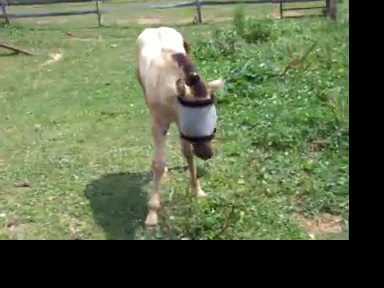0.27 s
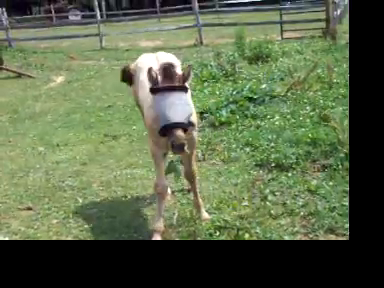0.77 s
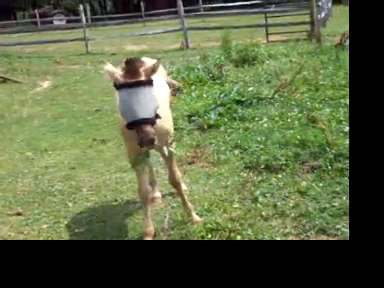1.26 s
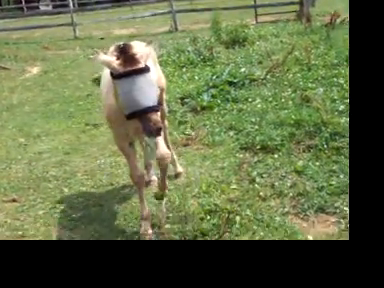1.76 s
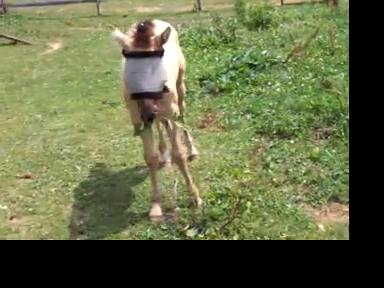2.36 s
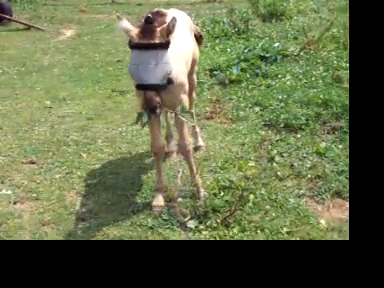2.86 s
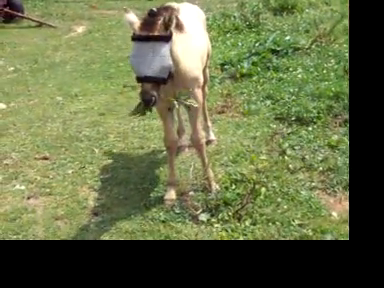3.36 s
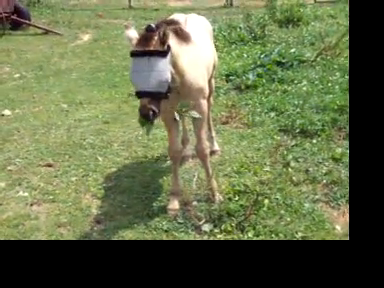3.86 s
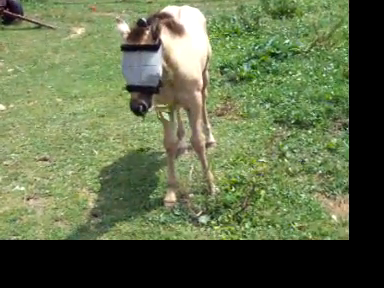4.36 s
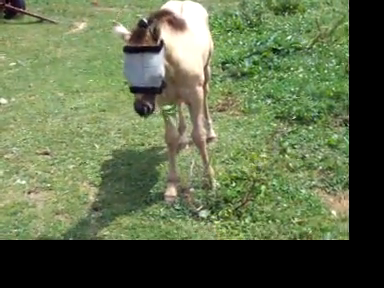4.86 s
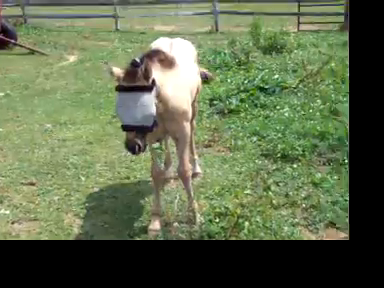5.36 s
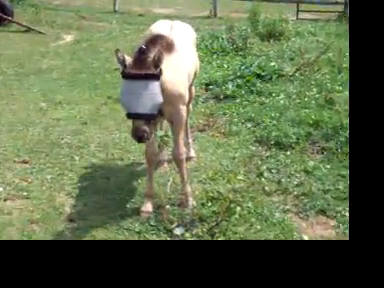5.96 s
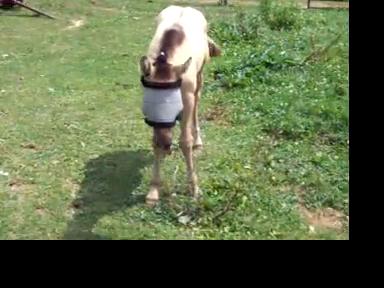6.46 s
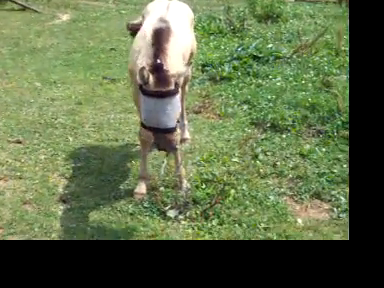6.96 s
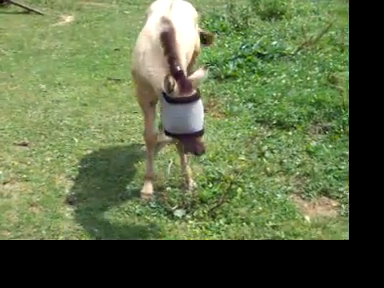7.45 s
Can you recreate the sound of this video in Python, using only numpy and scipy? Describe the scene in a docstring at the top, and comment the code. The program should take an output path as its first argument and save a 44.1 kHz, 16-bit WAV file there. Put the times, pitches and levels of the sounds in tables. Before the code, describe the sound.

A small camera's zoom motor buzzes in quick stuttering bursts, then case clicks and a scrape, over birdsong, grass swishes and light breeze in a pasture.

```python
"""Zoom camera in a summer pasture

A small hand-held camera buzzes as its zoom motor runs in short bursts of steps, each kicking the lens barrel.
Fingers click and scrape on the nearby case, which rings at its own pitches.
Grass swishes as clouds of tiny snaps, birds chirp in gliding tones, and insects shrill as a narrow hiss.
Behind them a distant engine drones and fades, a rush of air passes, and noise makes the wind and leaves."""
import sys
import numpy as np
from scipy import signal
from scipy.fft import rfft, irfft, next_fast_len
from scipy.io import wavfile
from scipy.ndimage import map_coordinates

SR = 44100
rng = np.random.default_rng(int(sys.argv[2]) if len(sys.argv) > 2 else 0)


def log_audio(samples):
    """Write samples as a 16-bit WAV file to the path given in sys.argv[1]."""
    # one column per channel
    frames = np.atleast_2d(samples).T
    # limit to full scale, then quantise
    limited = np.clip(frames, -1, 1)
    pcm = np.round(limited * 32767).astype(np.int16)
    wavfile.write(sys.argv[1], SR, pcm)


N = 340893
TIME = np.arange(N) / SR   # seconds


def from_db(db):
    """Turn decibels into a gain."""
    return 10 ** (np.asarray(db) / 20)


def rms_one(x):
    """Scale a sound to unit power."""
    return x / np.sqrt(np.mean(x ** 2) + 1e-20)


def in_time(rows):
    """Join the points of each column by straight lines, sample by sample."""
    s, *columns = np.transpose(rows)
    return [np.interp(TIME, s, column) for column in columns]


def drift(rate):
    """Wander smoothly at random, with so many new values per second and a spread of 1."""
    knots = rng.standard_normal(int(N / SR * rate) + 4)
    return rms_one(map_coordinates(knots, [TIME * rate], order=2, mode="nearest"))


def band(x, low_hz, high_hz):
    """Keep only the pitches between two limits."""
    sos = signal.butter(2, [low_hz, min(high_hz, .45 * SR)], "band", fs=SR, output="sos")
    return signal.sosfilt(sos, x)


def coloured(x, spectrum):
    """Shape a noise with a smooth spectrum, then scale it to unit power."""
    hz, db = np.transpose(spectrum)
    size = next_fast_len(N)
    bin_hz = np.maximum(np.arange(size // 2 + 1) * SR / size, 1)
    gain = from_db(np.interp(np.log(bin_hz), np.log(hz), db))
    return rms_one(irfft(rfft(x, size) * gain, size)[:N])


def ring(clicks, hz, t60):
    """Let each click set off a sine that dies by 60 dB in t60 seconds; a unit click starts it at height 1."""
    decay = from_db(-60 / (t60 * SR))
    turn = 2 * np.pi * hz / SR
    return signal.lfilter([0, np.sin(turn)], [1, -2 * decay * np.cos(turn), decay * decay], clicks + 1e-18)


def grains(per_s, spread_db):
    """Scatter tiny contacts of uneven size and random sign."""
    hits = rng.random(N) < per_s / SR
    signs = rng.choice([-1, 1], N)
    return hits * signs * from_db(spread_db * np.clip(rng.standard_normal(N), -2, 2))


def add(track, s, sound):
    """Mix a short sound into a track at a time in seconds."""
    at = max(round(s * SR), 0)
    track[at:at + len(sound)] += sound[:max(N - at, 0)]


def swell(s, half_s):
    """Rise and fall like a bell curve, 1 at its peak."""
    return np.exp(-((TIME - s) / half_s) ** 2 / 2)


def stroke(s, length_s, attack_s, sag_db_per_s, release_s):
    """Rise quickly, sag while held, then let go."""
    age = TIME - s
    attack = np.clip(age / attack_s, 0, 1)
    hold = from_db(-sag_db_per_s * np.clip(age - attack_s, 0, length_s))
    return attack * hold * np.exp(-np.maximum(age - length_s, 0) / release_s)


# Runs of the zoom motor. Each row: start in seconds, length in seconds.
ZOOM_RUNS = [(0.048, 0.011), (0.1108, 0.0051), (0.162, 0.0043), (.2106, 0.0064), (0.2937, 0.011),
             (0.36, 0.005), (0.4108, 0.0069), (0.461, .0062), (0.541, 0.015), (.609, 0.0068), (.661, 0.005),
             (0.71, 0.008), (.7923, 0.01), (1.2368, 0.005), (1.3085, 0.0067), (1.3602, 0.007), (1.41, .006),
             (1.491, 0.012), (1.608, .006), (1.6606, 0.0047), (1.709, .006), (1.7907, 0.015),
             (1.858, 0.0065), (1.909, 0.0064), (1.9572, 0.0075), (2.038, 0.01), (3.386, 0.0045),
             (3.4562, 0.008), (3.507, 0.0049), (3.555, 0.0077), (3.637, 0.01)]
# Ringing pitches of the lens barrel. Each row: pitch in Hz, strength in dB, time to die by 60 dB in seconds.
BARREL_MODES = [(248, -11.5, 0.043), (386, -11, 0.087), (558.6, -6, 0.053), (820, -0.5, 0.013),
                (981, -2, 0.027), (1320, -5.5, 0.018), (1990, -21, 0.016), (2430, -17, 0.031),
                (2944, -19.5, 0.007), (3960, -7.5, 0.0068), (4900, -24, 0.0042)]
STEP_HZ, NUDGE_HZ, DRIVER_HZ = 495.5, 538, 5857   # step rate of long runs and of short nudges; coil whistle
RUN_DB, NUDGE_DB, KNOCK_DB = -31.5, -33.5, -30   # typical step of a run and of a nudge; the knock ending a nudge


def zoom_motor(lead_s=0.0059, driver_db=-16, grit_db=-7.5, rattle_db=-9, first_step_db=-5, tail_s=0.0082,
               colour_db=1.5):
    """The coils whistle, then each step kicks the lens barrel; gears grind, and knock when a short nudge stops."""
    kicks, powered, turning = np.zeros((3, N))
    for s, length in ZOOM_RUNS:
        nudge = length < .008
        step_s, db = (1 / NUDGE_HZ, NUDGE_DB) if nudge else (1 / STEP_HZ, RUN_DB)
        count = max(round(length / step_s), 1)
        sizes = from_db(db + 2 * rng.standard_normal(16))   # steps kick unevenly
        add(kicks, s - step_s, sizes[-1:] * from_db(first_step_db))
        for k in range(count):
            add(kicks, s + k * step_s, sizes[k:k + 1])
        if nudge:
            add(kicks, s + (count - 1) * step_s, from_db([KNOCK_DB]))
        power_shape = signal.windows.tukey(round((length + lead_s) * SR), .3)
        add(powered, s - lead_s, from_db(db) * power_shape)
        add(turning, s - step_s, from_db(db) * np.ones(round((length + step_s) * SR)))

    # loose gear teeth chatter on for a moment and shake the barrel too
    fade = np.exp(-1 / (tail_s * SR))
    grinding = powered / 2 + signal.lfilter([1 - fade], [1, -fade], turning)
    rattle = from_db(rattle_db) * np.sqrt(STEP_HZ / SR) * grinding * rng.standard_normal(N)
    shaking = kicks + rattle

    barrel = np.zeros(N)
    for k, (hz, db, t60) in enumerate(BARREL_MODES):
        uneven = shaking * from_db(colour_db * drift(25.04))   # each pitch varies in strength on its own
        barrel += (-1) ** k * from_db(db) * ring(uneven, hz, t60)
    whistle = rms_one(band(rng.standard_normal(N), DRIVER_HZ - 90, DRIVER_HZ + 90))
    grit = rms_one(band(band(grains(6000, 7.4), 540, 3830), 300, 6500))
    return barrel + from_db(driver_db) * powered * whistle + from_db(grit_db) * grinding * grit


# Clicks on the camera case. Each row: start in seconds, strength in dB before the case colours it,
# brightness in dB per octave.
CASE_CLICKS = [(2.470, -37, 3.5), (3.199, -46.5, 10), (4.1789, -24.5, 10.5), (5.451, -38.5, 12.5),
               (5.552, -32.5, -3), (5.612, -34.5, 0), (5.6361, -28.5, 7), (5.6409, -21.5, 3),
               (5.6483, -24, -4.5), (5.66, -23.5, -1.5), (5.7352, -22, 1), (5.7645, -23.5, 9),
               (5.772, -21.5, -2), (5.781, -32, -7.5), (6.0234, -20, 0), (6.070, -44.5, 10.5),
               (6.844, -33.5, 3.5), (7.027, -37.5, 0), (7.2449, -27, 0.5)]
# Ringing pitches of the plastic case, for clicks and drags alike. Each row: pitch in Hz, relative strength in dB,
# time to die by 60 dB in seconds.
CASE_MODES = [(550, -1.5, 0.0086), (779, -2, 0.018), (1113, -4, 0.017), (1340, -3, 0.013),
              (2080, 1, 0.0097), (2523, -2, 0.014), (3255, 3, 0.006), (4160, 2.5, 0.0083),
              (5160, 4, 0.0031), (6780, -4.5, 0.0046)]
CLICK_PIVOT_HZ = 2090   # brightness tilts a click about this pitch


def case_clicks(scatter_db=3.5, soft_hz=6500):
    """Single finger clicks set the plastic case ringing, each with its own brightness."""
    s, click_db, brightness = np.transpose(CASE_CLICKS)
    at = np.round(s * SR).astype(int)
    clicks = np.zeros(N)
    for k, (hz, db, t60) in enumerate(CASE_MODES):
        strength = click_db + brightness * np.log2(hz / CLICK_PIVOT_HZ)
        softness = 1 / (1 + (hz / soft_hz) ** 4)   # a contact excites the top pitches less
        blows = np.zeros(N)
        blows[at] = softness * from_db(strength + db + scatter_db * rng.standard_normal(len(at)))
        clicks += (-1) ** k * ring(blows, hz, t60)
    return clicks


# A finger drags over the case. Each row: start in seconds, length in seconds, level in dB of the ringing part
# before the drag sags.
DRAGS = [(5.636, 0.013, -31), (5.645, 0.066, -37), (5.707, 0.057, -17.5)]
DRAG_ATTACK_S, DRAG_SAG_DB_PER_S, DRAG_RELEASE_S = 0.0086, 96, 0.0057


def finger_drags(slips_per_s=7000, slip_spread_db=3, rub_db=-10):
    """A dense run of finger slips rings the same case, with a duller rub underneath."""
    slips = grains(slips_per_s, slip_spread_db)
    scrape = np.zeros(N)
    for k, (hz, db, t60) in enumerate(CASE_MODES):
        scrape += (-1) ** k * from_db(db) * ring(slips, hz, t60)
    rub = from_db(rub_db) * rms_one(band(grains(slips_per_s, slip_spread_db), 230, 4000))
    pressure = np.zeros(N)
    for s, length, db in DRAGS:
        pressure += from_db(db) * stroke(s, length, DRAG_ATTACK_S, DRAG_SAG_DB_PER_S, DRAG_RELEASE_S)
    return pressure * (rms_one(scrape) + rub)


# Swishes of grass and leaves. Each row: peak time in seconds, half length in seconds,
# peak level in dB before flutter.
SWISHES = [(1.278, 0.007, -46), (1.991, 0.028, -45), (2.835, 0.11, -52.5), (3.32, .01, -45.5),
           (3.382, 0.019, -46), (3.73, 0.16, -50), (4.04, 0.031, -47.5), (4.314, 0.021, -44.5),
           (4.948, 0.054, -51.5), (5.312, .016, -44), (5.382, 0.01, -40), (5.455, 0.034, -40),
           (6.459, 0.052, -50.5)]
# Tone of a swish. Each row: pitch in Hz, relative level in dB.
SWISH_COLOUR = [(290, -37), (500, -9.5), (1150, -8.5), (1660, -14), (2500, -6.5), (4250, -1), (7330, -11),
                (9000, -32), (11700, -61), (19800, -120)]


def grass(blades_per_s=3200, blade_spread_db=4, flutter_db=3.0):
    """Each swish is a fluttering cloud of tiny blade snaps."""
    level = sum(from_db(db) * swell(s, half) for s, half, db in SWISHES)
    flutter = from_db(flutter_db * drift(110))
    return level * flutter * coloured(grains(blades_per_s, blade_spread_db), SWISH_COLOUR)


BUZZ_START_S, BUZZ_PERIOD_S, BUZZ_DB = 3.82, .142, -44.5
TRILL_START_S, TRILL_PERIOD_S, TRILL_DB = 4.315, .1105, -43   # level of the first sweep
TRILL_GROWTH_DB, PIP_LAG_S, PIP_DB = 0.77, .071, -51   # growth per sweep; each pip follows its sweep


def song(buzz_count=4, sweep_count=6):
    """List one song's calls: a row of buzzes, then a growing trill of falling sweeps with soft pips between."""
    buzzes = [(BUZZ_START_S + k * BUZZ_PERIOD_S, "buzz", BUZZ_DB) for k in range(buzz_count)]
    sweeps = [(TRILL_START_S + k * TRILL_PERIOD_S, "sweep", TRILL_DB + k * TRILL_GROWTH_DB)
              for k in range(sweep_count)]
    pips = [(s + PIP_LAG_S, "pip", PIP_DB) for s, _, _ in sweeps[:-1]]
    return buzzes + sweeps + pips


# The birds' notes by name. Each entry: length in seconds, start, middle and end pitch in Hz, roughness from 0 to 1.
NOTES = {"whistle": (.098, 2660, 3660, 3170, .25), "coo": (0.143, 1410, 1495, 1420, .43),
         "chip": (.026, 4450, 5450, 3900, 0.65), "upslur": (0.028, 3520, 4800, 4200, 0.34),
         "peep": (.057, 5000, 3400, 3600, .1), "rasp": (.071, 3550, 3330, 3310, .6),
         "buzz": (0.039, 2890, 3000, 2200, 0.73), "sweep": (.029, 4000, 3330, 2430, 0.11),
         "pip": (0.015, 2200, 2540, 2200, .1)}
# Single bird calls. Each row: start in seconds, name of the note, level in dB before flutter.
BIRD_CALLS = [(.492, "whistle", -46), (1.111, "rasp", -37.5), (2.516, "whistle", -44), (2.59, "coo", -48),
              (2.74, "upslur", -45), (2.772, "chip", -46), (2.776, "peep", -45), (3.09, "coo", -47.5),
              (4.775, "whistle", -48), (5.295, "chip", -44), (7.112, "whistle", -46),
              (7.247, "chip", -38.5), (7.31, "upslur", -35), (7.45, "coo", -48.5)]


def birds(waver=0.077, flutter_db=4, echo_db=-8, echo_s=0.12):
    """Tones glide through three pitches; rough ones waver in pitch and level; the trees scatter them."""
    voices = np.zeros(N)
    wobble = waver * drift(500)
    flutter = flutter_db * drift(200)
    for s, note, db in BIRD_CALLS + song():
        length, start_hz, middle_hz, end_hz, rough = NOTES[note]
        u = np.linspace(0, 1, round(length * SR))   # progress through the note
        now = np.minimum(round(s * SR) + np.arange(len(u)), N - 1)
        glide = np.polyval(np.polyfit([0, .5, 1], [start_hz, middle_hz, end_hz], 2), u)
        hz = glide * (1 + rough * wobble[now])
        shape = np.sqrt(np.maximum(np.sin(np.pi * u), 0))
        level = from_db(db + rough * flutter[now]) * shape
        add(voices, s, level * np.sin(2 * np.pi * np.cumsum(hz) / SR))
    trees = rng.standard_normal(SR // 2) * np.exp(-TIME[:SR // 2] / echo_s)
    echo = signal.fftconvolve(voices, trees / np.linalg.norm(trees))[:N]
    return voices + from_db(echo_db) * echo


INSECT_DB, INSECT_HZ, INSECT_PEAK_S, INSECT_SWELL_S = -55, 4750, 7.42, 0.62


def insects(spread_hz=260):
    """Many far insects blur into one narrow hiss that swells to a peak and eases off."""
    level = from_db(INSECT_DB) * swell(INSECT_PEAK_S, INSECT_SWELL_S)
    return level * rms_one(band(rng.standard_normal(N), INSECT_HZ - spread_hz, INSECT_HZ + spread_hz))


# The engine drones, drops away and returns faintly. Each row: time in seconds, drone level in dB before drone_db.
DRONE = [(0.1, -51), (0.12, -45.5), (1.79, -45), (2.17, -57), (2.58, -49), (4.01, -55.5), (5.49, -55),
         (7.6, -55.5)]
# a thin whine sinks from one pitch to another, then dies
WHINE_DB, WHINE_HIGH_HZ, WHINE_LOW_HZ = -56, 4310, 3390   # peak level before flicker
WHINE_SINK_S, WHINE_SETTLE_S, WHINE_END_S = .33, .78, 1.38


def far_engine(low_hz=145, high_hz=205, drone_db=1, whine_release_s=.07):
    """A low band of noise makes a blurred drone, and an unsteady sine makes the thin, sinking whine."""
    drone_level = from_db(drone_db + in_time(DRONE)[0])
    drone = drone_level * rms_one(band(rng.standard_normal(N), low_hz, high_hz))
    hz = np.interp(TIME, [WHINE_SINK_S, WHINE_SETTLE_S], [WHINE_HIGH_HZ, WHINE_LOW_HZ])
    unsteady_hz = hz * (1 + 0.0099 * drift(180))
    fade = np.exp(-np.maximum(TIME - WHINE_END_S, 0) / whine_release_s)
    whine_level = from_db(WHINE_DB + 3.1 * drift(30)) * fade
    return drone + whine_level * np.sin(2 * np.pi * np.cumsum(unsteady_hz) / SR)


# Tone of the rush of air. Each row: pitch in Hz, relative level in dB.
RUSH_COLOUR = [(180, -21), (300, -1.5), (630, -1), (864, -8.5), (1480, -2), (2110, -12), (2450, -3),
               (2860, -25), (3320, -13), (4250, -25), (5010, -10.5), (6690, -27.5), (8000, -32),
               (10400, -64), (17600, -120)]
RUSH_DB, RUSH_START_S, RUSH_LENGTH_S = -36.5, 1.364, 0.75   # level before it sags
RUSH_ATTACK_S, RUSH_SAG_DB_PER_S, RUSH_RELEASE_S = 0.28, 20.5, 0.1


def rush():
    """A broad, soft rush of air is shaped noise that swells, sags and dies."""
    level = stroke(RUSH_START_S, RUSH_LENGTH_S, RUSH_ATTACK_S, RUSH_SAG_DB_PER_S, RUSH_RELEASE_S)
    return level * from_db(RUSH_DB) * coloured(rng.standard_normal(N), RUSH_COLOUR)


# The breeze over time. Each row: time in seconds, far murk in dB, leaf hiss in dB, both before their gains below.
BREEZE = [(0.0, -49.5, -50), (0.404, -49.5, -53), (1.1, -52, -54.5), (2.25, -54.5, -53),
          (3.76, -54.5, -51.5), (5.2, -53, -51.5), (5.58, -50, -51.5), (5.85, -53, -49), (6.23, -50, -54),
          (7.73, -49.5, -52)]
# Tones of wind rumble, far murk and leaf hiss. Each row: pitch in Hz, relative level in dB.
RUMBLE_COLOUR = [(10, -35), (25, -14), (50, 2), (100, 4), (170, -6.5), (300, -9.5), (900, -54)]
MURK_COLOUR = [(80, -15), (230, 2), (400, -1), (900, -7.5), (1250, -9), (1500, -7.5), (2100, -11.5),
               (4000, -37.5), (9000, -51.5)]
HISS_COLOUR = [(600, -12.5), (2000, -4), (3400, 2.5), (4800, 3), (6300, -7), (8000, -8.5), (9500, -56.5)]
MURK_DB, HISS_DB = 2, -1   # gain of each on the breeze


def open_air(rumble_db=-51.5, flicker_db=2.11):
    """Wind rumble, far murk and leaf hiss are shaped noises that each waver on their own."""
    murk_db, hiss_db = in_time(BREEZE)
    layers = [(rumble_db, RUMBLE_COLOUR), (MURK_DB + murk_db, MURK_COLOUR), (HISS_DB + hiss_db, HISS_COLOUR)]
    air = np.zeros(N)
    for db, colour in layers:
        level = from_db(db + flicker_db * drift(25))
        air += level * coloured(rng.standard_normal(N), colour)
    return air


def scene():
    """The camera's own noises in front of the pasture."""
    camera = zoom_motor() + case_clicks() + finger_drags()
    pasture = grass() + birds() + insects() + far_engine() + rush() + open_air()
    return (camera + pasture)[None]


def record(dry):
    """The treble rolls off, then is cut steeply."""
    dull = signal.sosfilt(signal.butter(4, 8100, fs=SR, output="sos"), dry)
    return signal.sosfilt(signal.ellip(10, .3, 75, 8800, fs=SR, output="sos"), dull)


dry = scene()
out = record(dry)
log_audio(out)
```